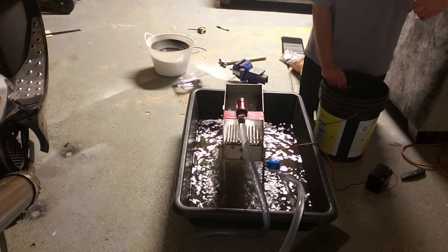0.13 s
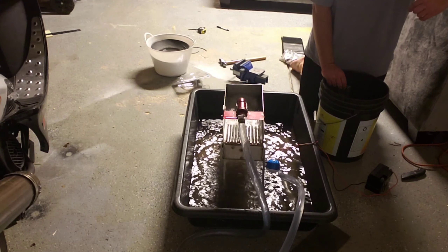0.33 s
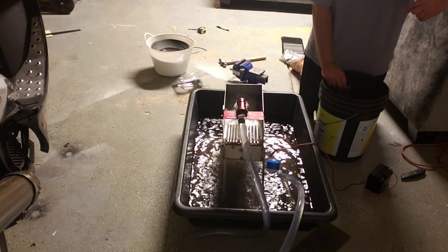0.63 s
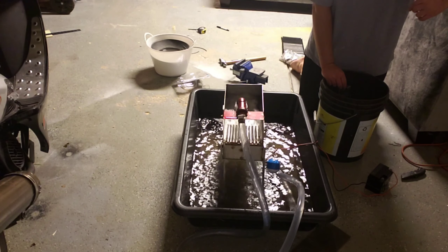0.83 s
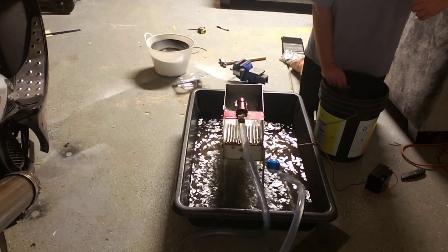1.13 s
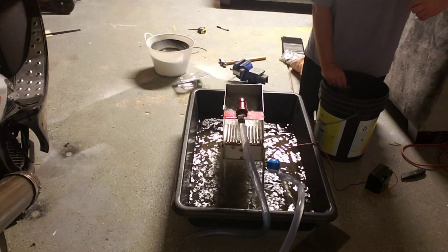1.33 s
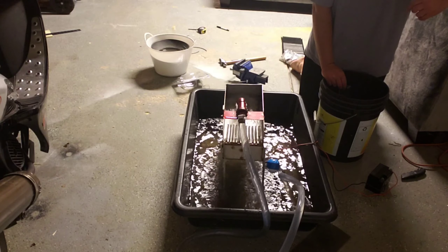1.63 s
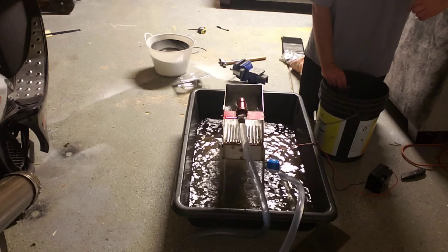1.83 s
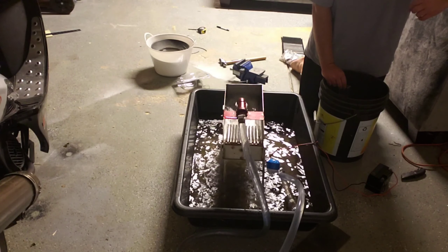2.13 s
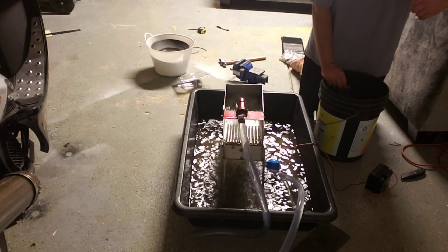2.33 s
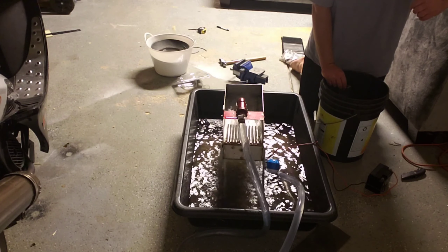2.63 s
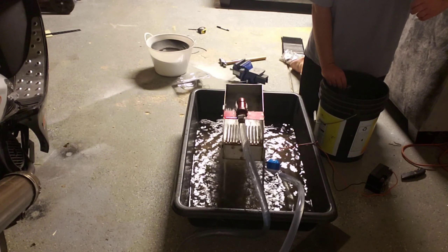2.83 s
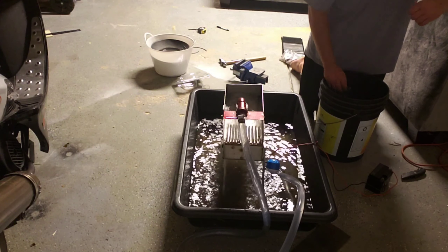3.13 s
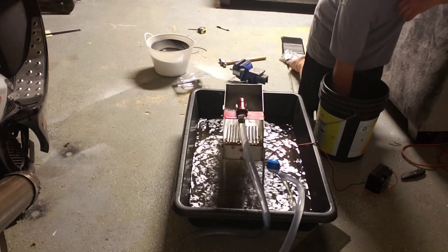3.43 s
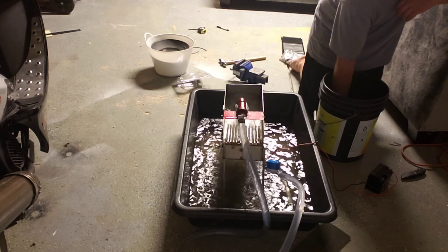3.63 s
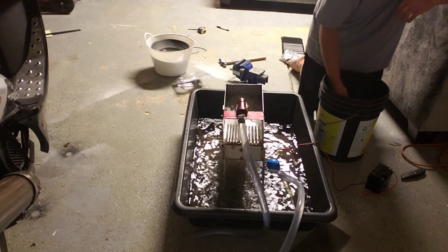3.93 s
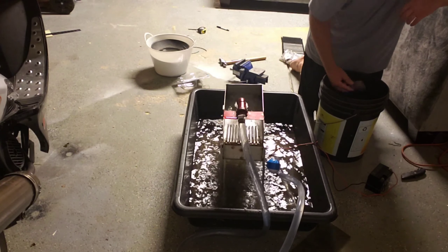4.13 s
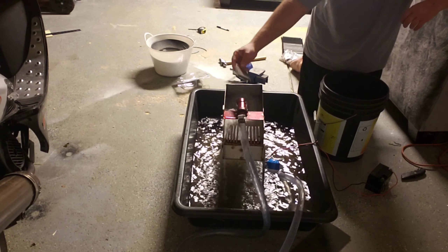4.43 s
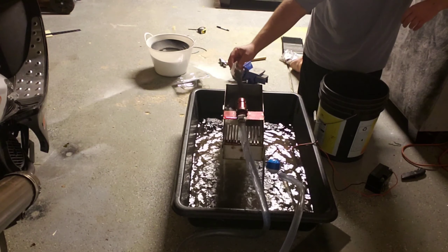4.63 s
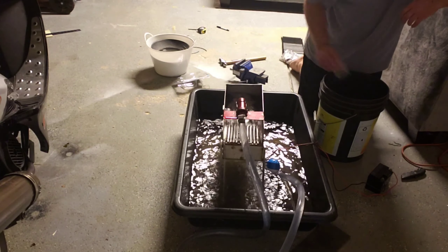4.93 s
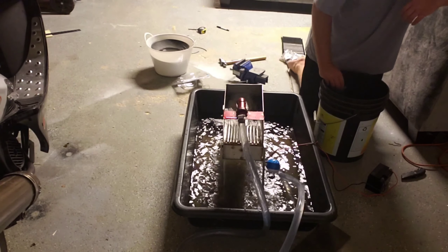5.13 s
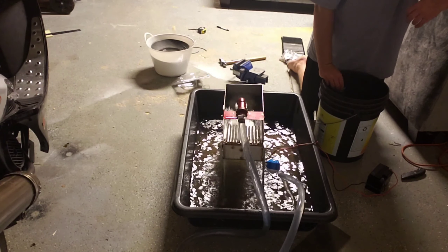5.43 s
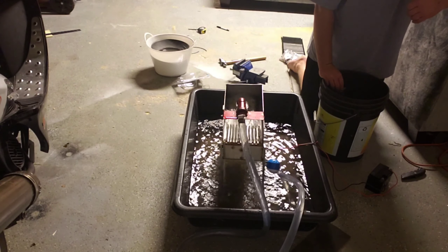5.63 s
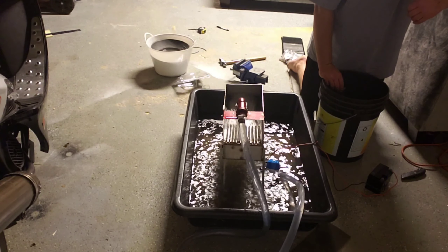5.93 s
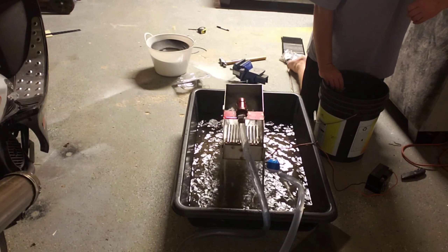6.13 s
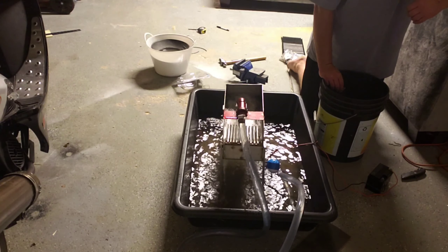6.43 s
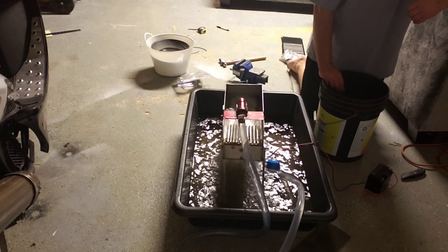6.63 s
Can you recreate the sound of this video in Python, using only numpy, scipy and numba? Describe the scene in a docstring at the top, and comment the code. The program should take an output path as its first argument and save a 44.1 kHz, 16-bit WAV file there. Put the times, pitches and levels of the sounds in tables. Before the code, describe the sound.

A steady trickle of pumped water falls into a tub with small plops, ticking spray and a faint hum underneath.

```python
"""Pumped water into a garage tub

A garage, with a phone's two closely spaced microphones two metres from a plastic tub.
Pumped water runs down a small sluice and falls in: countless bubbles ring and spray ticks in
uneven surges over a rushing wash, and bigger bubbles plop now and then. Underneath, the pump
whines on two thin tones, a far motor briefly spins up and the garage hums low."""
import sys
import numpy as np
from scipy import signal
from scipy.fft import rfft, irfft, next_fast_len
from scipy.io import wavfile
from scipy.ndimage import uniform_filter1d, map_coordinates
from numba import njit

SR = 44100
rng = np.random.default_rng(int(sys.argv[2]) if len(sys.argv) > 2 else 0)


def digitize_waveform(pressure):
    """Quantize a signal to 16-bit integers and store it at the path in sys.argv[1].

    Rows of a 2-D input are taken as channels; values are limited to [-1, 1].
    """
    field = np.atleast_2d(pressure).T
    bounded = np.clip(field, -1, 1)
    quanta = np.round(bounded * 32767).astype(np.int16)
    wavfile.write(sys.argv[1], SR, quanta)


N = 298998


def undb(db):
    """Decibels to gain."""
    return 10 ** (np.asarray(db) / 20)


def level(x, db):
    """Scale to an rms level."""
    return x * undb(db) / np.sqrt(np.mean(x ** 2))


def lean_right(x, db):
    """Make the right channel db louder than the left."""
    return x * undb(np.array([[-db], [db]]) / 2)


def curve(table):
    """Columns of a time table, one value a sample."""
    times, *columns = np.transpose(table)
    return [np.interp(np.arange(N) / SR, times, column) for column in columns]


def band(x, lo_hz, hi_hz):
    """Gentle band-pass."""
    return signal.sosfilt(signal.butter(2, [lo_hz, hi_hz], "bandpass", fs=SR, output="sos"), x)


def colour(x, points, rings=()):
    """Shape the spectrum by a smooth curve, with narrow peaks and dips on top."""
    f = np.maximum(np.fft.rfftfreq(N, 1 / SR), 1)
    hz, db = np.transpose(points)
    total_db = np.interp(np.log(f), np.log(hz), db)
    for hz, width, db in rings:
        total_db += db / (1 + (2 * (f - hz) / width) ** 2)
    return irfft(rfft(x) * undb(total_db), N)


def walk(per_s):
    """A smooth random wander with a spread near 1."""
    hold = int(SR / per_s)
    steps = np.repeat(rng.standard_normal(N // hold + 1), hold)
    return 1.37 * uniform_filter1d(uniform_filter1d(steps, hold), hold)[:N]


def flicker(per_s):
    """A walk without its slow drift."""
    wander = walk(per_s)
    return wander - uniform_filter1d(wander, SR // 5)


def bumps(table):
    """Level change in dB: one smooth bump or dip per row."""
    t = np.arange(N) / SR
    return sum(db * np.exp(-.5 * ((t - s) / half_s) ** 2) for s, db, half_s in table)


def surges(fall_s, per_s=40):
    """Random jumps that fall away, with a spread of 1."""
    when, height = rng.random((int(per_s * N / SR), 2)).T
    kicks = np.bincount((when * N).astype(int), height, N)
    jumps = signal.lfilter([1], [1, -np.exp(-1 / (fall_s * SR))], kicks)
    jumps = uniform_filter1d(jumps, SR // 300)
    jumps -= uniform_filter1d(jumps, SR // 8)
    return jumps / jumps.std()


def mic_noise(alike_hz, least_apart):
    """Noise at two close microphones: alike below alike_hz, unrelated far above."""
    mid, side = rng.standard_normal((2, N))
    f = np.fft.rfftfreq(N, 1 / SR)
    apart = least_apart + (1 - least_apart) * f ** 2 / (f ** 2 + alike_hz ** 2)
    mid, side = rfft(mid) * np.sqrt(1 - apart / 2), rfft(side) * np.sqrt(apart / 2)
    return irfft(np.array([mid + side, mid - side]), N)


@njit
def ring(start, hz, cycles, rise, size, lag):
    """Each bubble swells within a cycle, then fades by 1/e every `cycles` as its pitch climbs."""
    out = np.zeros((2, N + 64))
    for k in range(len(start)):
        step = 2 * np.pi * hz[k] / SR
        fade, swell = np.exp(-hz[k] / (cycles[k] * SR)), np.exp(-3 * hz[k] / SR)
        climb = 1 + rise * hz[k] / (cycles[k] * SR)
        gain, held_back, phase, i = size[k], 1., 0., start[k] + 16
        while gain > size[k] / 100 and i < N + 16:
            pressure = gain * (1 - held_back) * np.sin(phase)
            out[0, i] += pressure
            out[1, i + lag[k]] += pressure
            phase, step = phase + step, min(step * climb, 3.)
            gain, held_back = gain * fade, held_back * swell
            i += 1
    return out[:, 16:N + 16]


def swarm(per_s, span_hz, cycles, rise, spread_db, cap_db, patch_db, patch_per_s, max_lag):
    """Random bubbles at unit rms; those of like size come in patches that flare and fade."""
    when, pitch, strength, length, bearing = rng.random((int(per_s * N / SR), 5)).T
    start = (when * N).astype(np.int64)
    lo_hz, hi_hz = span_hz
    hz = lo_hz * (hi_hz / lo_hz) ** pitch
    patches = np.array([flicker(patch_per_s) for _ in range(6)])
    flare = map_coordinates(patches, [5 * pitch, start], order=1)
    strength_db = np.minimum(-spread_db * np.log(1 - strength), cap_db)
    size = hz * undb(strength_db + patch_db * flare)
    # samples between the microphones: most burst straight ahead, a few off to either side
    lag = np.round(max_lag * (2 * bearing - 1) ** 3).astype(np.int64)
    return level(ring(start, hz, cycles * (.5 + length), rise, size, lag), 0)


def lone_bubbles(times, db, hz, cycles, rise):
    """Bubbles straight ahead, each at its own time, level and pitch."""
    start = (times * SR).astype(np.int64)
    return ring(start, hz, np.full(len(start), cycles), rise, undb(db), np.zeros_like(start))


def tub(x):
    """Tub, floor and microphone colour the water; the result has unit rms."""
    # broad response: f/Hz, gain/dB
    response = [(410, -64), (700, -10), (898, -16), (1040, -17), (1180, -17.5), (1360, -17.5),
                (1580, -11.5), (1970, -10.5), (3240, -2), (4100, -7.5), (5260, -6.5), (6920, -9),
                (10700, -13), (14200, -11.5), (16000, -17)]
    # narrow peaks and dips: f/Hz, width/Hz, gain/dB
    rings = [(2660, 340, 3.5), (3070, 91, 3), (3200, 240, 1), (3710, 390, 2.5), (4660, 360, -4.5),
             (5360, 280, 2.5), (6870, 430, -5), (8650, 210, 1.5), (9360, 150, 3.5), (10000, 330, -3),
             (10560, 360, 6), (11400, 360, 4.5), (14300, 660, 1.5)]
    return level(colour(x, response, rings), 0)


def water():
    """The falling sheet: bubbling and spray, each a surging swarm over a rush of noise."""
    # slow flow of the sheet: t/s, bubbling level/dB, spray level/dB
    flow = [(0.0, -48.5, -44), (0.38, -49, -45), (1.3, -49, -44.5), (1.56, -50, -45), (1.87, -48, -44),
            (3.32, -49.5, -44.5), (3.64, -50, -45.5), (4.25, -48.5, -44), (4.53, -49.5, -44.5),
            (4.81, -48, -45.5), (5.04, -49.5, -44.5), (6.04, -49, -45), (6.23, -48.5, -45.5),
            (6.78, -48.5, -43.5)]
    # clusters of bubbles bursting at once: t/s, rise/dB, half-length/s
    gurgles = [(0.458, 2, 0.02), (0.756, 2.5, 0.012), (0.929, 3.5, 0.027), (1.111, 2, 0.037),
               (1.391, 0.8, 0.028), (1.587, 2.8, 0.032), (2.12, 1.5, 0.045), (2.519, 3, 0.014),
               (3.22, 1.5, 0.05), (3.597, 2, 0.021), (3.795, 3, 0.01), (3.946, 3, 0.0098),
               (4.269, 1.5, 0.024), (4.557, 2, 0.02), (5.34, 2, 0.05), (5.645, 3.5, 0.02),
               (5.748, 2, 0.019), (6.209, 3, 0.028)]
    # lulls in the bubbling: t/s, dip/dB, half-length/s
    lulls = [(0.868, -2.5, .02), (1.93, -3.5, 0.027), (2.025, -4.5, 0.03), (2.345, -3, 0.042),
             (3.974, -4.5, .015), (2.8, -2, 0.04), (5.156, -3, 0.06), (5.57, -2, 0.04), (6.313, -4, 0.053)]
    # splashes of spray: t/s, rise/dB, half-length/s
    splashes = [(0.268, 1, 0.037), (0.774, 2.5, 0.051), (0.966, 3.5, 0.023), (1.088, 2, 0.017),
                (1.177, 1.5, 0.076), (1.45, 1, 0.031), (1.76, 3, 0.017), (2.335, 1.5, 0.031),
                (2.768, 1.5, 0.056), (3.225, 1.2, 0.023), (3.522, 2.5, 0.044), (3.752, 4, 0.011),
                (4.012, 1.5, 0.018), (4.929, 2.5, 0.026), (5.33, 1.5, 0.03), (5.72, 3, 0.011),
                (5.891, 2.5, 0.022), (6.129, 4, 0.018), (6.256, 2.5, 0.013), (6.322, 2, 0.014),
                (6.549, 1.9, 0.015)]
    bubbling_db, spray_db = curve(flow)
    surge_db = bumps(gurgles) + bumps(lulls) + 0.55 * surges(fall_s=0.0096)
    spray_db += bumps(splashes) + surges(fall_s=0.018)
    rush = mic_noise(6800, 0.032)
    bubbles = swarm(1400, (895, 4502), cycles=8.2, rise=0.029,
                    spread_db=2.8, cap_db=8, patch_db=0.9, patch_per_s=24, max_lag=5)
    fizz = swarm(6000, (4326, 16120), cycles=14.7, rise=0.0388,
                 spread_db=2.7, cap_db=9.5, patch_db=0.72, patch_per_s=25, max_lag=3.8)
    droplets = swarm(400, (5100, 12700), cycles=0.95, rise=0.14,
                     spread_db=5.5, cap_db=6.1, patch_db=4.1, patch_per_s=14, max_lag=2.2)
    bubbling = tub(bubbles + level(band(rush, 770, 4400), -6.5))
    spray = tub(fizz + undb(-6.5) * droplets + level(band(rush, 6650, 11500), -10.5))
    # bubbles below 2300 Hz follow only a share of each surge
    deep = signal.sosfiltfilt(signal.butter(3, 2300, fs=SR, output="sos"), bubbling)
    bubbling = undb(0.3 * surge_db) * deep + undb(surge_db) * (bubbling - deep)
    return undb(bubbling_db) * bubbling + undb(spray_db) * spray


def high_hiss():
    """A faint, even hiss in the top octave."""
    return level(band(mic_noise(9000, 0.11), 9600, 16800), -52)


def tone(hz, db, waver_hz):
    """A thin tone that wavers in level and pitch."""
    gain = np.sqrt(2) * undb(db + 2.1 * walk(9))
    return gain * np.sin(2 * np.pi * np.cumsum(hz + waver_hz * walk(12)) / SR)


def pump():
    """The pump whines on two tones, one drifting down, one nearly steady."""
    # upper tone: t/s, f/Hz, level/dB
    whine = [(0, 1032.5, -71), (6.78, 1021, -73.5)]
    return tone(*curve(whine), waver_hz=1.2) + tone(hz=943, db=-78.5, waver_hz=0.17)


def hum():
    """Low garage noise with deep gurgles in the tub, stronger on the right."""
    # room tone spectrum: f/Hz, relative level/dB
    spectrum = [(53, -66), (90, -35), (134, -16.5), (223, -2.5), (306, 0), (401, -4), (441, -5), (526, -1),
                (620, -7), (894, -14), (1030, -7.5), (1190, -13.5), (1500, -14), (1950, -44), (3300, -120)]
    # slow drift of the low noise: t/s, level/dB
    drift = [(0.0, -66), (0.45, -66), (1.87, -66), (2.44, -64.5), (3.5, -67), (6.78, -65.5)]
    air = level(colour(mic_noise(2300, 0.024), spectrum), 0) * undb(3.4 * flicker(10))
    gulps = swarm(30, (190.4, 380), cycles=6.9, rise=0.005,
                  spread_db=2, cap_db=6, patch_db=1.5, patch_per_s=7.3, max_lag=0)
    return lean_right((air + undb(-9) * gulps) * undb(curve(drift)[0]), db=1.9)


def rumble(top_hz=85):
    """A faint unsteady rumble."""
    low = signal.sosfilt(signal.butter(3, top_hz, fs=SR, output="sos"), mic_noise(3000, 0.38))
    return level(low, -101) * undb(6.5 * flicker(7))


def far_motor():
    """Each run fades in, climbs towards full speed while it grows fainter, then dies away."""
    # motor runs: start t/s, stop t/s, level before the fades/dB
    runs = [(-1.7, 0.04, -46), (1.56, 3.05, -63.5)]
    low_hz, top_hz, spin_up_s = 355, 413, 0.4
    attack_s, droop_db_per_s, release_db_per_s = 0.4, 11, 160
    t, out = np.arange(N) / SR, 0
    for start, stop, db in runs:
        age = np.maximum(t - start, 0)
        hz = top_hz - (top_hz - low_hz) * np.exp(-age / spin_up_s)
        fade_db = droop_db_per_s * age + release_db_per_s * np.maximum(t - stop, 0)
        out += np.minimum(age / attack_s, 1) * tone(hz, db - fade_db, waver_hz=1.6)
    return out


def plops(slap_s=0.012):
    """A big bubble rings briefly over a dull slap of water on the tub."""
    # large bubbles and drops: t/s, level/dB, f/Hz, slap level/dB
    drops = [(0.02, -54, 1040, -56), (0.086, -48, 1060, -54), (0.963, -45, 1860, -50.5),
             (1.338, -41, 1757, -56), (1.527, -47, 1100, -54), (1.831, -45, 1530, -54),
             (2.359, -39, 1704, -55.5), (3.358, -40.5, 1850, -69), (3.392, -43, 2040, -69),
             (4.0, -41, 1750, -57), (4.737, -41, 1620, -59), (4.855, -46, 1950, -68),
             (5.096, -39.5, 1740, -54), (5.613, -46, 1950, -52), (5.955, -44, 1770, -75),
             (5.99, -41, 1920, -69), (6.056, -35, 1650, -54.5), (6.438, -42, 1065, -49),
             (6.592, -40, 1800, -53)]
    times, db, hz, slap_db = np.transpose(drops)
    blows = np.zeros(N)
    blows[(times * SR).astype(int)] = undb(slap_db)
    fade = signal.lfilter([1], [1, -np.exp(-1 / (slap_s * SR))], blows)
    slap = fade * level(band(rng.standard_normal(N), 600, 2560), 2.2)
    return lone_bubbles(times, db, hz, cycles=3.9, rise=0.036) + slap


def pings(followers=3):
    """Small bubbles ring clear, each trailed by a few fainter ones of like size."""
    # the loudest small bubbles: t/s, level/dB, f/Hz
    leaders = [(0.123, -31.5, 6470), (0.1522, -30, 3250), (0.2021, -30, 3250), (0.3114, -33, 3250),
               (0.3534, -31.5, 2700), (0.445, -33, 2780), (0.7135, -29.5, 5800), (0.931, -28, 3350),
               (1.408, -33.5, 2870), (1.6647, -33.5, 3120), (1.815, -28.5, 3170), (2.2162, -33.5, 3350),
               (2.6418, -29.5, 5100), (2.871, -28.5, 5430), (3.0708, -32, 2810), (3.1262, -32, 2850),
               (3.214, -31, 3300), (3.242, -36, 2150), (3.325, -27, 5540), (3.3442, -32, 3140),
               (3.4774, -33, 3070), (3.59, -30.5, 3030), (3.792, -29.5, 3370), (3.8486, -31.5, 3190),
               (3.884, -32.5, 3200), (3.946, -34.5, 3080), (4.012, -29.5, 6400), (4.1019, -28, 3110),
               (4.258, -29.5, 3010), (4.3814, -34.5, 4250), (4.6198, -34.5, 2740), (4.849, -32.5, 2820),
               (4.9213, -31, 5560), (5.0556, -30, 3230), (5.2831, -32, 3050), (5.315, -32, 5300),
               (5.335, -31, 5200), (5.3555, -33, 2440), (5.362, -32, 5300), (5.3829, -31, 3310),
               (5.4518, -31, 3140), (5.4947, -31, 3270), (5.6368, -33, 3300), (5.6862, -31, 3030),
               (5.723, -32, 2850), (5.7576, -29, 3250), (5.7766, -30.5, 5170), (5.8653, -29, 3250),
               (5.905, -29.5, 3190), (5.9877, -30.5, 3770), (6.055, -36.5, 3590), (6.2113, -33.5, 3560),
               (6.655, -33.5, 3690)]
    times, db, hz = np.transpose(leaders)
    delay, drop, detune = rng.random((len(times), 3 * followers)).T.reshape(3, followers, -1)
    trail_times = (times + .002 + .008 * delay).ravel()
    trail_db = (db - 10 - 6 * drop).ravel()
    trail_hz = (hz * (.9 + 0.238 * detune)).ravel()
    trail = lone_bubbles(trail_times, trail_db, trail_hz, cycles=8.3, rise=0.019)
    return lone_bubbles(times, db, hz, cycles=4.7, rise=0.017) + trail


def ticks():
    """Droplets in the spray ring so high and briefly that they tick."""
    # the crispest droplets: t/s, level/dB, f/Hz
    droplets = [(0.7502, -30, 10500), (0.9428, -32, 11500), (0.9657, -29, 9470), (1.0794, -34, 7340),
                (1.4047, -30, 10500), (1.4636, -28, 8510), (1.8971, -28, 8800), (1.943, -31, 8710),
                (2.7162, -29, 7850), (2.7571, -29, 8750), (3.556, -25, 10400), (4.4109, -29, 10500),
                (4.7985, -29, 8280), (6.2546, -25, 9200), (6.3144, -30, 10400), (6.3274, -29, 11700)]
    return lone_bubbles(*np.transpose(droplets), cycles=5.5, rise=0.03)


def garage(x, spots=12, t60_s=0.14, echo_db=-3):
    """Echoes from floor and walls; the splash hops between spots, each with its own dying tail."""
    t = np.arange(SR // 4) / SR
    share = undb(16.7 * np.array([walk(40) for _ in range(spots)]))
    share /= np.sqrt(np.sum(share ** 2, 0))
    air = mic_noise(2700, 0.073)
    decay = np.exp(-np.log(1000) * t / t60_s) * (t > .002)
    size, echo = next_fast_len(N + len(t)), 0
    for k, part in enumerate(share * x.mean(0)):
        tail = air[:, k * len(t):(k + 1) * len(t)] * decay
        tail /= np.sqrt(np.sum(tail ** 2) / 2)
        echo += rfft(part, size) * rfft(tail, size)
    return (x + undb(echo_db) * irfft(echo, size)[:, :N]) / np.sqrt(1 + undb(2 * echo_db))


def scene():
    """Water, pump, motor and hum sit a little right of the phone, over the rumble."""
    wet = garage(water() + high_hiss() + plops() + pings() + ticks())
    # the water sounds carry nothing below about 217 Hz
    wet = signal.sosfilt(signal.butter(4, 217, "highpass", fs=SR, output="sos"), wet)
    return lean_right(wet + pump() + far_motor() + hum(), db=1.5) + rumble()


def record(dry):
    """The phone cuts off steeply above 15620 Hz."""
    return signal.sosfilt(signal.ellip(12, .2, 70, 15620, fs=SR, output="sos"), dry)


dry = scene()
out = record(dry)
digitize_waveform(out)
```